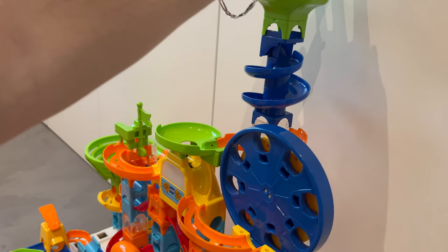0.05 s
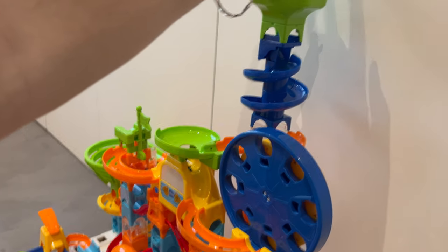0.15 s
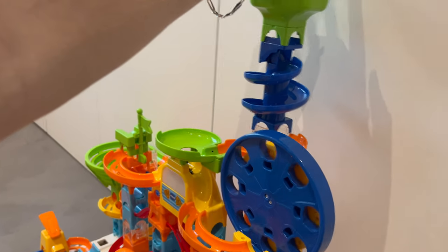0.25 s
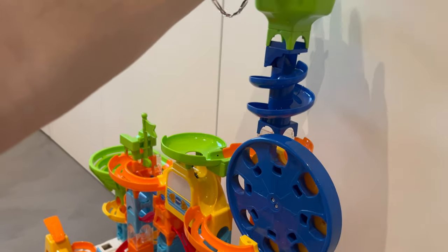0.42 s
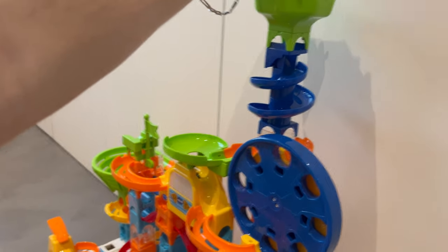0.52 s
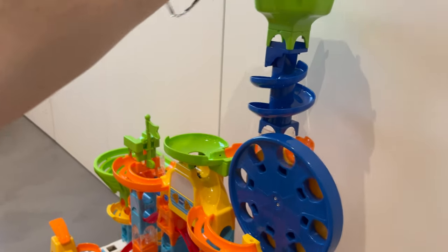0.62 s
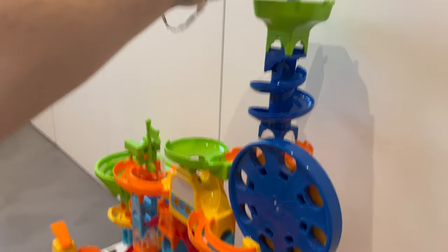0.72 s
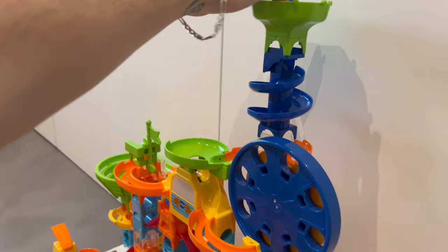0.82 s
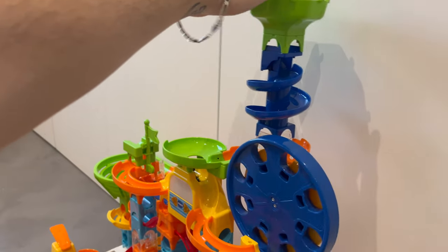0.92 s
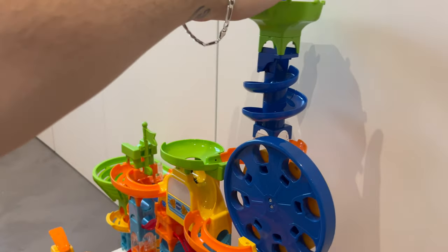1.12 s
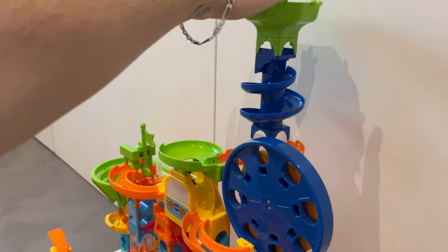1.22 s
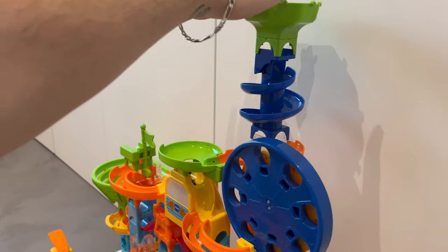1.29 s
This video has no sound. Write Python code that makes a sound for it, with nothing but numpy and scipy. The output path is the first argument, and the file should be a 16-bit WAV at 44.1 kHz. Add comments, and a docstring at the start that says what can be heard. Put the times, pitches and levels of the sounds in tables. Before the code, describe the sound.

Plastic balls drop into a toy ball run, clattering in two sharp bursts with light ticks after

```python
"""Toy ball run

Hard plastic balls drop into a toy ball run, heard close up in a small bare room.
Each clack is a blow and a short chatter of contacts that ring the hollow plastic tower.
Small random ticks rattle between the clacks, and late soft low thumps are decaying sines.
A little motor hums as a wavering sine; its gears whirr as noise in narrow resonances, over a floor of noise.
"""
import sys
import numpy as np
from scipy import signal
from scipy.fft import rfft, irfft, next_fast_len
from scipy.io import wavfile

SR = 44100
rng = np.random.default_rng(int(sys.argv[2]) if len(sys.argv) > 2 else 0)


def unload_audio(sound):
    """Save the sound as a 16-bit wav file, at the path given as the first command line argument."""
    columns = np.transpose(np.atleast_2d(sound))
    # keep every value between -1 and 1, then stretch to whole-number steps
    steps = np.round(np.clip(columns, -1, 1) * 32767)
    wavfile.write(sys.argv[1], SR, steps.astype(np.int16))


N = 59535


def amp(db):
    """Amplitude factor of a level in dB."""
    return 10 ** (np.asarray(db) / 20)


def unit(x):
    """x scaled to an RMS of 1."""
    return x / np.sqrt(np.mean(x ** 2) + 1e-20)


def along(points, hz):
    """Values at hz from (Hz, value) points, on a log frequency axis."""
    f, v = np.transpose(points)
    return np.interp(np.log(hz + 1), np.log(f + 1), v)


def curve(rows):
    """One value per sample from (seconds, value) rows."""
    return np.interp(np.arange(N) / SR, *np.transpose(rows))


def filtered(x, response):
    """x times a complex response of frequency."""
    n = x.shape[-1]
    m = next_fast_len(n + SR // 4)
    spectrum = rfft(x, m) * response(np.fft.rfftfreq(m, 1 / SR))
    return irfft(spectrum, m)[..., :n]


def causal(gain):
    """The minimum-phase response with this gain, by folding the cepstrum."""
    cepstrum = irfft(np.log(gain + 1e-6))
    half = len(cepstrum) // 2
    cepstrum[1:half] *= 2
    cepstrum[half + 1:] = 0
    return np.exp(rfft(cepstrum))


def spread(x, alike):
    """Two unrelated signals mixed to a left-right likeness by frequency."""
    def mid_side(hz):
        turn = np.arccos(np.clip(along(alike, hz), -1, 1)) / 2
        return np.array([np.cos(turn), np.sin(turn)])

    mid, side = filtered(x, mid_side)
    return unit(np.array([mid + side, mid - side]))


# Modes of the hollow tower. Each row: nominal pitch in Hz, relative level in dB, t60 in s.
TOWER_MODES = [(329, -4.5, 0.054), (453.4, 0.5, 0.052), (799, -9.5, 0.17), (938, -6.5, 0.11),
               (1106.7, -3.5, 0.11), (1495, -2, 0.11), (1916, 2.5, 0.16), (2250, 1.5, 0.048),
               (2458, 0, 0.07), (2720, -4.5, 0.07), (2906, -1, 0.07), (3350, 2.5, 0.025), (3660, 1, 0.015),
               (4330, 4.5, 0.015)]
# Spectrum of one contact click. Each row: frequency in Hz, relative gain in dB.
CONTACT_CLICK = [(60, -79), (100, -41.5), (320, -7), (550, -7.5), (830, -4), (1250, -9.5), (1900, -3.5),
                 (3000, -3), (4400, -12), (5500, -17), (7000, -15.5), (8500, -17.5), (11000, -18.5),
                 (13000, -20.5), (15000, -22.5), (16800, -41.5)]
MODE_SCATTER_DB, DETUNE_SHARE = 3, 0.007
FALL_DB, MOST_FALL_DB = 25.5, 7  # mode loss one octave from the strongest, before the cap; the cap
TREBLE_HZ, LOW_CUT_HZ = 6250, 274
KNOCK_FROM_HZ, KNOCK_TO_HZ = 354, 1180


def plastic(ring_db, knock_db, best_hz):
    """Impulse responses of body (energy 1) and treble: contact click plus tower, struck somewhere new."""
    t, hz = np.arange(8192) / SR, np.fft.rfftfreq(8192, 1 / SR)
    click = irfft(causal(amp(along(CONTACT_CLICK, hz))))
    luck = rng.standard_normal((len(TOWER_MODES), 2))
    ring = 0
    for (f, db, t60), (level_luck, pitch_luck) in zip(TOWER_MODES, luck):
        fall_db = min(FALL_DB * np.log2(f / best_hz) ** 2, MOST_FALL_DB)
        decay = amp(db + MODE_SCATTER_DB * level_luck - fall_db - 60 * t / t60)
        ring = ring + decay * np.sin(2 * np.pi * f * (1 + DETUNE_SHARE * pitch_luck) * t)
    both = rfft(unit(click) + amp(ring_db) * unit(ring))
    knock_band = 1 / (1 + (hz / KNOCK_TO_HZ) ** 4) / (1 + (KNOCK_FROM_HZ / (hz + 1)) ** 4)
    low = amp(knock_db * knock_band) / (1 + (LOW_CUT_HZ / (hz + 1)) ** 6)
    high = 1 / (1 + (TREBLE_HZ / (hz + 1)) ** 12)  # power share sent to the treble
    body = irfft(both * causal(low * np.sqrt(1 - high)))
    treble = irfft(both * causal(low * np.sqrt(high)))
    return np.array([body, treble]) / np.linalg.norm(body)


# Rattle of the rolling balls. Each row: time in s, level in dB.
RATTLE_LEVEL = [(0, -47), (.07, -60), (.13, -90), (.22, -91), (.25, -37), (.335, -31.5), (.37, -35.5),
                (.45, -39.5), (.5, -59), (.63, -59), (.79, -67), (.82, -35.5), (.86, -45), (.92, -38),
                (.955, -48), (.99, -32.5), (1.05, -49.5), (1.13, -79), (1.2, -48), (1.29, -83),
                (1.35, -39.5)]
TICKS_PER_S, TICK_SCATTER_DB = 1400, 3.5
TICK_RING_DB, TICK_TREBLE_DB, TICK_KNOCK_DB, TICK_RING_HZ = -8.5, -8.5, 0.5, 1840


def rattle():
    """Dense small ticks of rolling balls, from four parts of the run that ring a little differently."""
    out = np.zeros(N)
    for part in range(4):
        chance, sign, size = rng.random((3, N))
        struck = chance < TICKS_PER_S / 4 / SR
        ticks = struck * np.sign(sign - 0.5) * amp(-TICK_SCATTER_DB * np.log(size + 1e-4))
        response = amp([0, TICK_TREBLE_DB]) @ plastic(TICK_RING_DB, TICK_KNOCK_DB, TICK_RING_HZ)
        drive = unit(ticks) / 2 * amp(curve(RATTLE_LEVEL))  # four halves add up to RMS 1
        out += signal.fftconvolve(drive, response)[:N]
    return out


# Motor hum. Each row: time in s, RMS level in dB.
HUM_LEVEL = [(0, -60), (.1, -69), (.15, -94), (.4, -67.5), (.8, -66), (1.1, -68), (1.2, -75), (1.35, -65)]
# Gear resonances. Each row: centre in Hz, width in Hz, relative level in dB.
GEAR_PEAKS = [(1500, 40, -11), (1870, 70, -5), (2220, 30, -4), (2370, 35, -3), (3620, 40, 0),
              (3900, 90, -6), (4310, 45, 0)]
# Stereo of gears and air. Each row: frequency in Hz, left-right likeness from 0 to 1.
ALIKE = [(60, 1), (345, 0.67), (1000, 0.091), (2400, 0.64), (5500, 0.44), (8200, 1), (10000, 0.97),
         (12000, 1)]
HUM_HZ, DRIFT_RAD, GEARS_DB = 419, 0.006, -56


def motor():
    """A hum with randomly walking phase, and gear noise in narrow resonances."""
    drift = np.cumsum(rng.standard_normal(N)) * DRIFT_RAD
    tone = np.sin(2 * np.pi * HUM_HZ * np.arange(N) / SR + drift)
    hum = np.sqrt(2) * amp(curve(HUM_LEVEL)) * tone

    def resonances(hz):
        total = 0
        for k, (centre, width, db) in enumerate(GEAR_PEAKS):
            damping = 1j * hz * width
            total = total + (-1) ** k * amp(db) * damping / (centre * centre - hz * hz + damping)
        return total

    whirr = spread(filtered(rng.standard_normal((2, N)), resonances), ALIKE)
    return hum + amp(GEARS_DB) * whirr


# Spectrum of the room floor. Each row: frequency in Hz, relative gain in dB.
AIR_SPECTRUM = [(15, -48), (25, -16), (90, -2), (190, -10.5), (350, -17), (1000, -8.5), (2300, -9),
                (4400, -9.5), (5300, -13), (8500, -23.5), (11500, -21), (14000, -30), (16000, -51)]
AIR_DB = -60.5


def air():
    """The steady floor of the room: shaped stereo noise."""
    noise = filtered(rng.standard_normal((2, N)), lambda hz: amp(along(AIR_SPECTRUM, hz)))
    return amp(AIR_DB) * spread(noise, ALIKE)


# Clacks. Each row: start in s, body level in dB, treble in dB re body, low knock in dB, ring in dB re click,
# strongest ring near Hz, rise in s, chatter t60 in s.
CLACKS = [(0.054, -36, 6, 17, -4, 1810, 0.0035, 0.042), (0.097, -42.5, -4, -8, -8, 1900, 0.0015, 0.022),
          (0.1886, -35, 0.5, -1, -1.5, 2510, 0.00011, 0.096),
          (0.2329, -25.5, 21, -19, 9, 2440, 0.00067, 0.09),
          (0.2388, -11.5, 14, -8.5, -0.5, 3560, 0.00083, 0.044),
          (.243, -18, 0, -2.5, 5.5, 458, 0.001, 0.049), (0.265, -20, -16, -21, -11, 820, 0.0025, 0.057),
          (0.281, -23.5, -1, -6, -3, 2000, 0.0018, 0.1), (.304, -16, 5.5, -15, 1.5, 2350, 0.00052, 0.035),
          (.317, -20, 0, -16, -3, 2390, 0.00059, 0.019), (0.339, -13.5, 3, -8.5, 3.5, 2120, 0.00031, 0.027),
          (.361, -23.5, 5, -6.5, -2, 775, 0.00047, 0.076), (.374, -18, -2, -0.5, 1.5, 2300, 0.00065, 0.021),
          (0.397, -22, 25, -29, -22, 900, 0.00058, 0.014),
          (.399, -16.5, 11.5, -11, -3.5, 840, 0.00037, 0.023),
          (.411, -19.5, -5, -4, 9.5, 1450, 0.0013, 0.056), (0.44, -19, 7, -6, -5.5, 1600, 0.001, 0.025),
          (.804, -24, 9, 3, -2.5, 2250, 0.0031, 0.062), (.819, -22, 7, -5, 5, 3600, 0.0023, 0.025),
          (.873, -27, 8, -1, -7, 3730, 0.0025, 0.089), (.888, -31.5, 6, 10, -3, 750, 0.00091, 0.09),
          (0.901, -29, 5, -1, -6, 2200, 0.0017, 0.069), (0.9584, -14, 7, -2, 0, 2850, 0.0036, 0.04),
          (0.965, -21, 15.5, 5, 4, 1900, 0.00082, 0.032), (0.986, -25, -11, -8, -9, 2420, 0.0011, 0.029),
          (1.008, -21.5, 10.5, -8, 3.5, 860, 0.0018, 0.058),
          (1.017, -18, -0.5, 1.5, -0.5, 3360, 0.0009, 0.054),
          (1.028, -31.5, -6, 1, 3.5, 370, 0.0022, 0.057), (1.086, -34, 5, 9.5, -10, 900, 0.0022, 0.098),
          (1.098, -29.5, 8, 13, -11, 930, 0.0043, 0.027), (1.162, -44, 4.5, 3, -11, 2200, 0.0013, 0.1),
          (1.171, -31, -1, 8.5, -10, 2820, 0.0013, 0.066),
          (1.186, -31.5, 2, -0.5, -0.5, 4270, 0.0017, 0.045),
          (1.223, -37.5, -1, 11, -6.5, 960, 0.00054, 0.047),
          (1.334, -34.5, 4.5, 7.5, -1.5, 1000, 0.0012, 0.083),
          (1.340, -32.5, -14, -2, 15, 1940, 0.00085, 0.057)]
SPIKY_DB, TREBLE_LIFE_SHARE = 4, 0.57  # treble chatter lasts this share of the whole
BLOW, BLOW_RISE_S = 3.3, 0.0031  # first blow at zero rise; rise that halves it


def clacks():
    """Each clack: a blow in a chatter of uneven contacts that swells and dies; its treble dies sooner."""
    out, t = np.zeros(N + SR), np.arange(SR // 10) / SR
    for start, db, treble_db, knock_db, ring_db, best_hz, rise, t60 in CLACKS:
        rise = max(rise, 1e-4)
        life = max(t60, 0.002) * np.array([[1], [TREBLE_LIFE_SHARE]])
        unevenness = rng.standard_normal(len(t))
        chatter = unit(unevenness_noise(unevenness))
        shape = (1 - np.exp(-t / rise)) ** 2 * amp(-60 * t / life)
        energy = np.linalg.norm(shape[0])
        chatter *= energy / np.linalg.norm(chatter * shape[0])
        chatter[round(2 * rise * SR)] = BLOW / (1 + (rise / BLOW_RISE_S) ** 2)
        parts = signal.fftconvolve(chatter * shape, plastic(ring_db, knock_db, best_hz), axes=1)
        sound = amp([db, db + treble_db]) @ parts * energy / np.linalg.norm(parts[0])
        out[round(start * SR):][:len(sound)] += sound
    return out[:N]


def unevenness_noise(unevenness):
    """White noise made spiky by a random level per sample."""
    return rng.standard_normal(len(unevenness)) * amp(SPIKY_DB * unevenness)


# Frame thumps. Each row: start in s, level in dB before rise and decay, pitch in Hz.
THUMPS = [(1.114, -37, 165), (1.119, -39, 290), (1.156, -38, 250)]
THUMP_T60_S, THUMP_RISE_S = 0.04, 0.007


def thumps():
    """Soft low bumps of the whole frame: short decaying sines, hardly ringing."""
    out, t = np.zeros(N + SR), np.arange(SR // 5) / SR
    for start, db, hz in THUMPS:
        shape = amp(db - 60 * t / THUMP_T60_S) * (1 - np.exp(-t / THUMP_RISE_S))
        out[round(start * SR):][:len(t)] += shape * np.sin(2 * np.pi * hz * t)
    return out[:N]


# Decay of the room. Each row: frequency in Hz, t60 in s.
WALLS = [(200, 0.4), (1500, 0.33), (5000, 0.35), (14000, 0.19)]
# Stereo of the echo. Each row: frequency in Hz, left-right likeness from 0 to 1.
ROOM_ALIKE = [(60, 1), (500, 0), (2300, 0), (5300, 0.47), (8400, 0.97), (10000, 0.69), (12000, 0.98)]
ROOM_DB, ECHO_DELAY_SAMPLES = -3.5, 150


def room(x):
    """Noise tails whose frequencies die at their own speeds; a new tail for each 0.1 s of input."""
    out, step = np.zeros(x.shape), SR // 10
    for start in range(0, N, step):
        noise = spread(rng.standard_normal((2, SR // 2)), ROOM_ALIKE)
        hz, t, z = signal.stft(noise, SR, nperseg=256)
        decay = amp(-60 * t / along(WALLS, hz)[:, None])
        tail = signal.istft(z * decay, SR, nperseg=256)[1]
        late = np.pad(x[:, start:start + step], ((0, 0), (ECHO_DELAY_SAMPLES, 0)))
        wet = signal.fftconvolve(late, tail / np.linalg.norm(tail[0]), axes=1)
        out[:, start:][:, :wet.shape[1]] += wet[:, :N - start]
    return out


def scene():
    """The balls and thumps with their echo, the motor and the floor."""
    balls = np.tile(clacks() + rattle() + thumps(), (2, 1))
    return balls + amp(ROOM_DB) * room(balls) + motor() + air()


# Phase between the two pickup ports. Each row: frequency in Hz, left lead in radians.
PORT_PHASE = [(0, 0), (345, -.2), (1000, -.2), (1720, 0), (4000, .7), (5900, -1.2), (8000, -2.9),
              (10000, -4.7), (11400, -6.1), (14100, -8.2), (15500, -9.4), (17000, -9.6)]
# Balance of the ports. Each row: frequency in Hz, left over right in dB.
PORT_LEAN = [(300, 2), (1000, -3), (2400, 2.5), (3300, 1), (4800, 4.5), (9000, 0.5)]
TOP_HZ = 16800


def record(dry):
    """Two ports differ in phase and level by frequency; nothing is kept from the band limit up."""
    def ports(hz):
        half_phase = 0.5j * np.interp(hz, *np.transpose(PORT_PHASE))
        half_lean = along(PORT_LEAN, hz) * np.log(10) / 40
        return np.exp((half_phase + half_lean) * [[1], [-1]]) * (hz < TOP_HZ)

    return filtered(dry, ports)


dry = scene()
out = record(dry)
unload_audio(out)
```